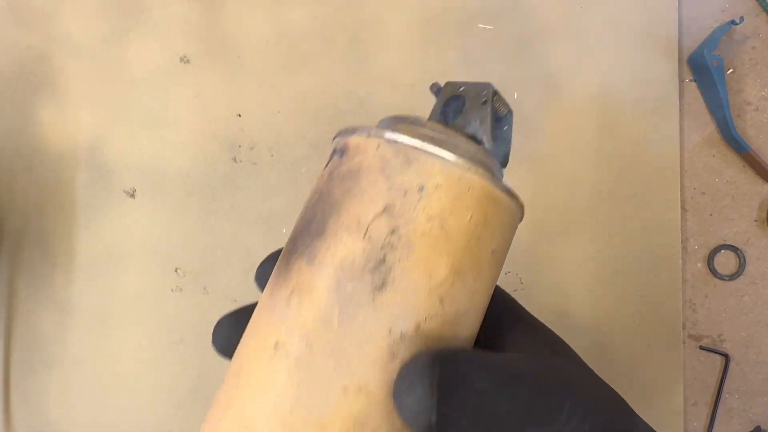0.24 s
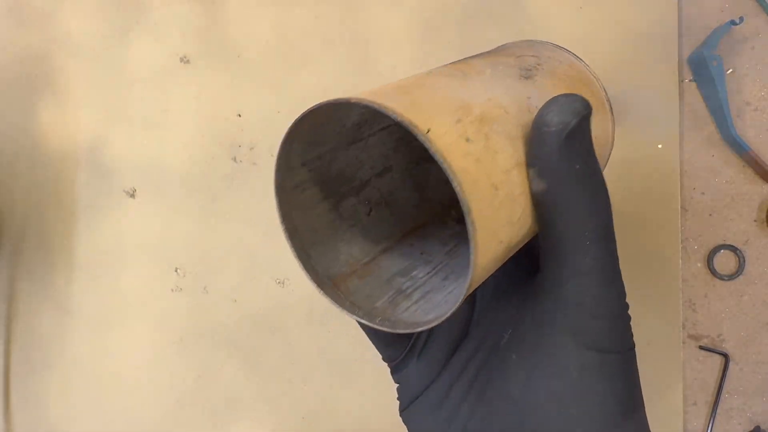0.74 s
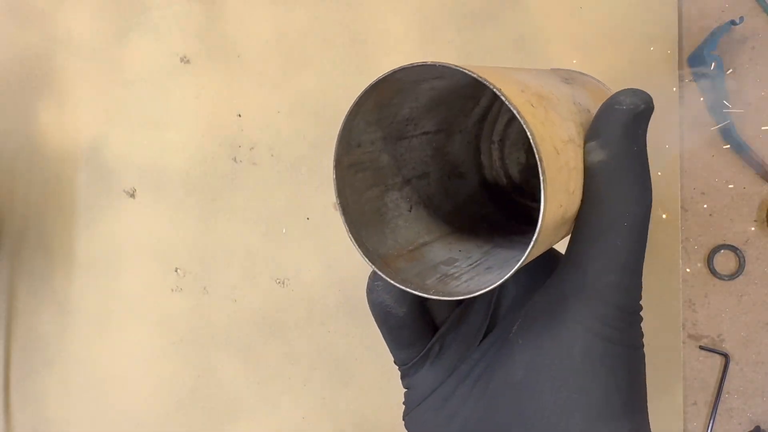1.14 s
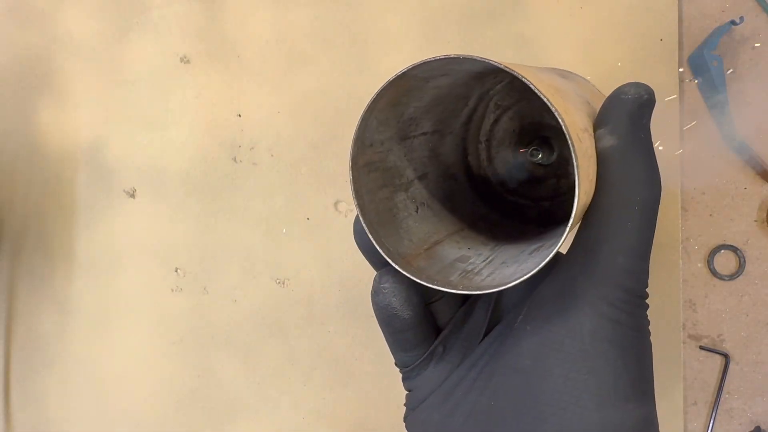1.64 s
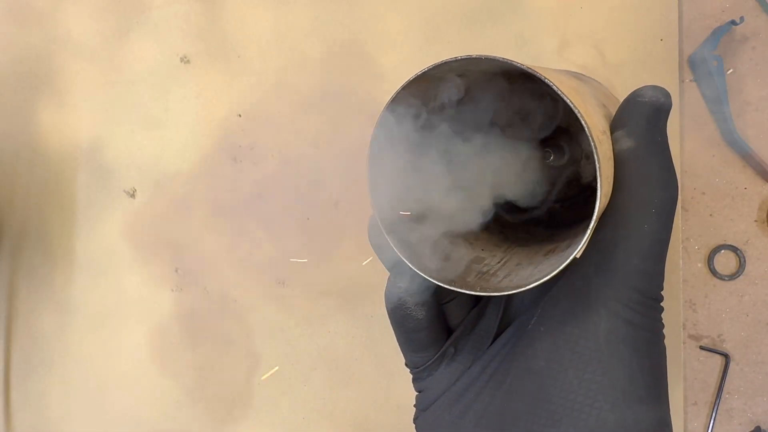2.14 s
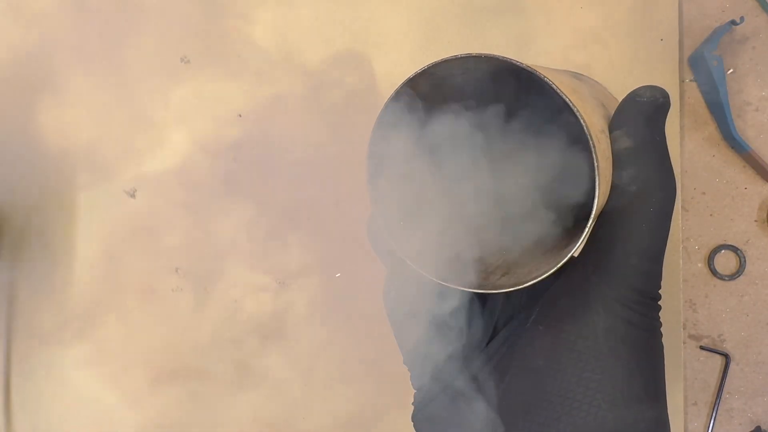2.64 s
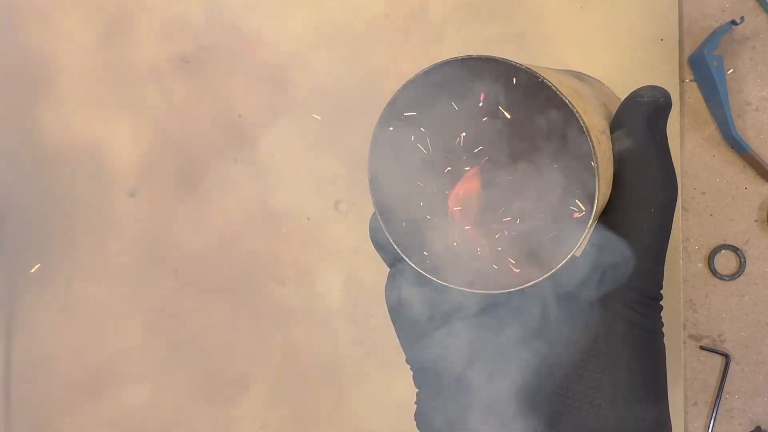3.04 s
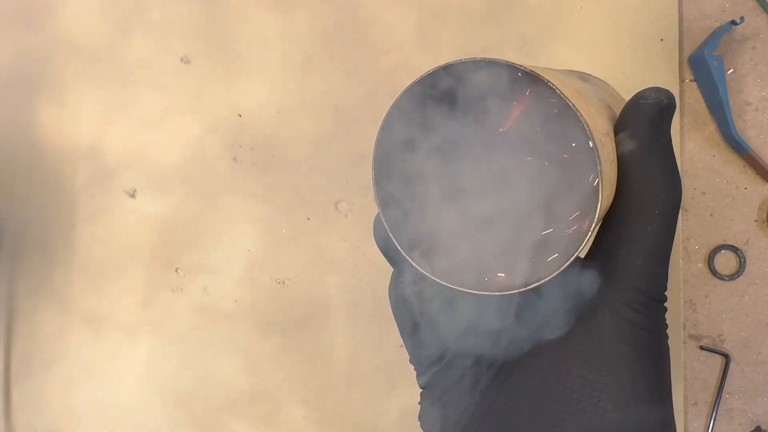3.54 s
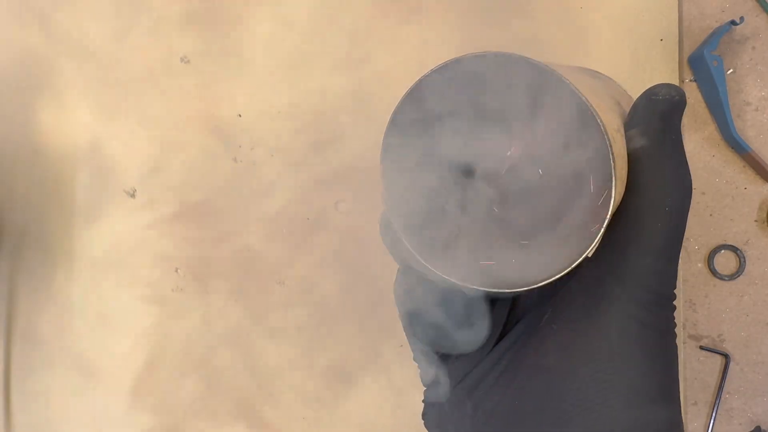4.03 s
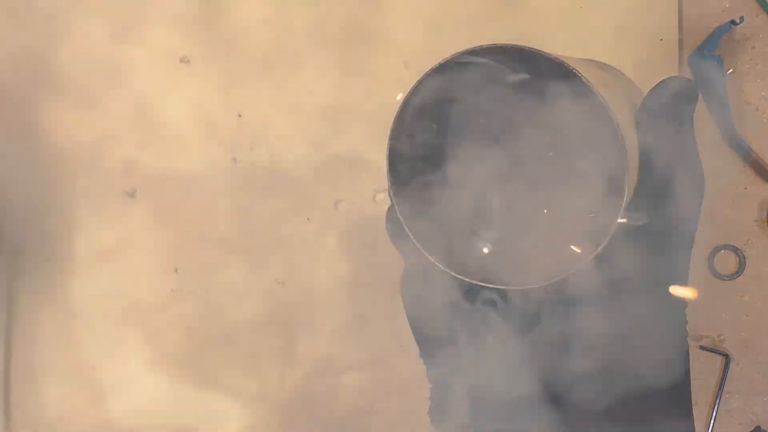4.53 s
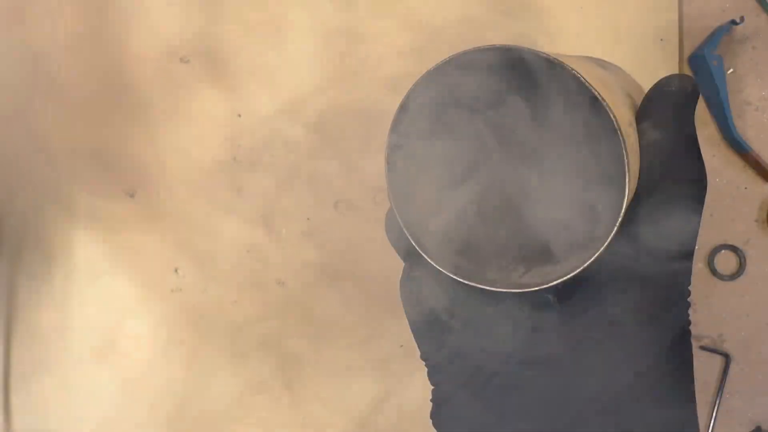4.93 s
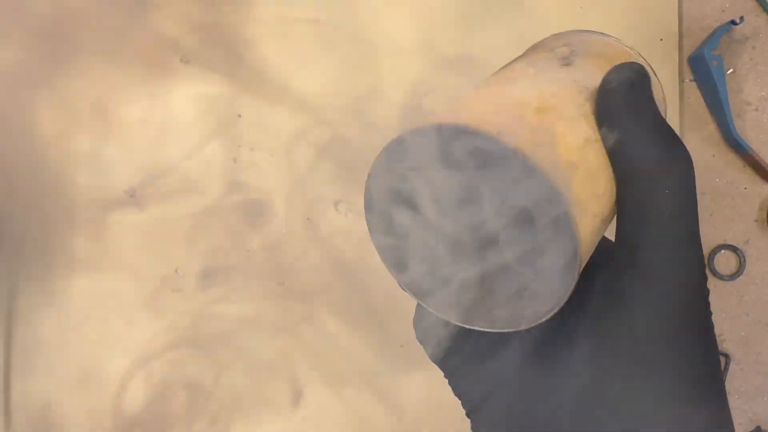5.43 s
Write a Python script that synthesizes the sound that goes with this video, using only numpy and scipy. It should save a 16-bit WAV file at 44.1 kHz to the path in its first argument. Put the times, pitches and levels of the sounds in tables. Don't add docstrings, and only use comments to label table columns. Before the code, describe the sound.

Close, dry take with the input overloading at first. From 0 s a fuze jet spits and crackles, dips briefly, then swells to a harsh distorted blast peaking around 0.22 s and cutting off by 0.25 s. A much quieter bright hiss continues, its tone sweeping as the can turns, with dense sharp sputters from about 0.7 to 1.6 s. It then sinks to a thin, whistly hiss, with faint hollow can resonance, through 2.9 s. At 2.95 s flame breaks into the can: a stuttering, fizzing onset with a sharp flare near 3.1 s, then a hollow, tube-like roar around 630 Hz rising past 700, fluttering and surging. It collapses after 4.37 s, with a small wheeze and a pop at 4.47 s. Sparse light metallic ticks follow, one clearer at 5.18 s, and a very faint glove rub near 5.35 s. Low mains hum and distant engine drone lie underneath.

```python
import sys
import numpy as np
from scipy import signal
from scipy.fft import rfft, irfft
from scipy.io import wavfile
from scipy.ndimage import uniform_filter1d, map_coordinates

SR = 44100
rng = np.random.default_rng(int(sys.argv[2]) if len(sys.argv) > 2 else 0)


def natural_amplitude(level_db):
    exponent = np.asarray(level_db, float) / 20
    return 10 ** exponent


def wav_record(signal):
    frames = np.transpose(np.atleast_2d(signal))
    bounded = np.clip(frames, -1, 1)
    quanta = np.round(bounded * 32767).astype(np.int16)
    wavfile.write(sys.argv[1], SR, quanta)


N = 250355
T = np.arange(N) / SR

# time in seconds, jet level in dB.
FIRST_BLAST = [(0.0, -13), (0.05, -21.5), (0.078, -25), (0.09, -18), (0.122, -20.5), (0.18, -14),
               (0.203, -10.5), (0.211, -12), (0.216, -5.5), (0.2425, -7), (0.245, -16.5), (0.256, -36),
               (0.28, -44)]
# time in seconds, jet level in dB.
LATER_BURN = [(0.28, -33), (0.576, -30.5), (0.71, -29), (0.816, -28), (1.08, -31), (1.478, -30.5),
              (1.59, -32), (1.62, -29), (1.722, -37.5), (1.88, -47), (1.92, -45.5), (2.09, -42.5),
              (2.15, -47.5), (2.328, -51), (2.56, -48), (2.72, -39.5), (2.9, -42), (2.95, -49)]


def vent():
    blast_db, blasting = curves(FIRST_BLAST, fade=.004)
    jet_db, burning = curves(LATER_BURN, fade=.018)
    away = ramp(.56, .76) ** 1.4
    fading = ramp(1.6, .11)
    sparking = np.interp(T, [.3, 1.1, 1.6, 1.9], [.35, .51, .49, .3])
    early = T < .27

    spits, small = vent_spits(jet_db, sparking, away)
    flow = noise() * steady_hiss(jet_db, burning, sparking)
    flow += np.sign(noise()) * (spits * ~early + small)
    blast = noise() * natural_amplitude(blast_db + 1.5 * wobble(300)) * blasting
    blast += np.sign(noise()) * spits * early

    puff = natural_amplitude(-36.5 + .2 * (blast_db + 22)) * (T < .25)
    puff += natural_amplitude(jet_db - 20) * burning * (1 - fading)
    return table_echo(turning_jet(flow, away, fading) + opening_blast(blast) + vent_puffs(puff))


# time in seconds, peak in dB, low puff in dB under it.
BLAST_SPITS = [(0.0014, -9.5, -21), (0.01, -3.5, -16.5), (0.015, -6.5, -16.5), (0.037, -5.5, -17.5),
               (0.0695, -8, -24.5), (0.0803, 2.5, -28.5), (0.089, -9, -20.5), (0.0926, -6.5, -19.5),
               (0.1065, -7, -5), (0.201, -1.5, -30.5), (0.216, 6, -41.5), (0.223, 3.5, -12),
               (0.229, 6.5, -10.5), (0.237, 7, -12.5)]
# time in seconds, peak in dB, low puff in dB under it.
SPUTTERS = [(0.3813, -12, -20.5), (0.5275, -15, -22), (0.6885, -11, -51), (0.7857, -3.5, -22.5),
            (1.3345, -5.5, -25.5), (0.825, -10.5, -24.5), (0.8564, -10, -54), (0.8815, -6, -34),
            (0.893, -4, -34.5), (0.8962, 2, -26.5), (0.9195, -6, -30), (0.9284, -9, -39),
            (0.9713, -3.5, -36), (0.993, -10, -44), (1.0305, -10, -42), (1.057, -11, -19),
            (1.0632, -6, -16.5), (1.07, -0.5, -22), (1.076, 0.5, -19.5), (1.146, -10.5, -39),
            (1.1662, -8.5, -29), (1.1863, -5, -22.5), (1.2193, -9, -14.5), (1.2427, -10, -21),
            (1.28, -10.5, -27), (1.3406, -1, -23), (1.3695, -5.5, -23.5), (1.45, -2.5, -19.5),
            (1.4588, -5, -16), (1.501, -8.5, -40), (1.5366, -8.5, -22), (1.551, -5.5, -21.5)]
# time in seconds, peak in dB.
SMALL_SPITS = [(0.3911, -21), (0.6066, -20), (0.6509, -24), (0.6545, -23), (0.7027, -18.5), (0.7073, -17),
               (0.7151, -19.5), (0.7459, -18), (0.7578, -17), (0.7651, -15), (0.7828, -16), (0.7924, -15),
               (0.8026, -15.5), (0.8186, -19.5), (0.8242, -20), (0.8296, -12.0), (0.8701, -20.5),
               (0.8758, -17.5), (0.9042, -15), (0.9133, -16), (0.9355, -18.5), (0.9552, -16.5),
               (0.9696, -21.5), (0.9817, -14.5), (0.9853, -14.5), (1.0213, -20.5), (1.0667, -16),
               (1.0825, -9.5), (1.0867, -8), (1.181, -13.9), (1.192, -13.5), (1.195, -19), (1.2161, -15.5),
               (1.2247, -17.5), (1.2654, -20), (1.2761, -17), (1.3058, -21), (1.3157, -18.5),
               (1.3185, -21.5), (1.3454, -15), (1.384, -20.5), (1.3913, -21.5), (1.4003, -20.5),
               (1.4248, -17), (1.4298, -19.5), (1.4442, -16), (1.4547, -14.5), (1.4623, -14.5),
               (1.4652, -13), (1.4697, -12.5), (1.543, -16.5), (1.5504, -20.5), (1.5563, -21),
               (1.5665, -15.6), (1.6047, -20), (1.6093, -17.5), (1.6144, -22.5), (1.6172, -21),
               (1.6316, -22), (1.6555, -20)]


def vent_spits(jet_db, sparking, away):
    s, db, _ = np.transpose(BLAST_SPITS + SPUTTERS)
    ms = np.ones(len(s))
    sharp = bursts(s + .0007, natural_amplitude(db - 4.5), .99 * ms, rise=.49)

    loud = np.clip((db + 16) / 8, 0, 1)
    cluster = bursts(np.maximum(s - .0015, 0), loud * natural_amplitude(db - 13), 4.95 * ms, rise=.78)
    cluster *= natural_amplitude(4.5 * wobble(400))

    when, size = rng.random((150, 2)).T
    stray = bursts(.55 + 1.1 * when, 2.1 - 2.3 * np.log(size + 1e-3), .22 + 0 * when)
    stray *= natural_amplitude(jet_db) * sparking * (.27 + away)

    small_s, small_db = np.transpose(SMALL_SPITS)
    small = bursts(small_s - .0003, natural_amplitude(small_db + 6.5), .65 + 0 * small_s, rise=.35)
    return sharp + cluster + stray, small


# time in seconds, level in dB.
LAST_WHEEZE = [
    (4.36, -42.5),
    (4.566, -66.5),
    (4.572, -61),
    (4.66, -77),
]


def steady_hiss(jet_db, burning, sparking):
    grain = natural_amplitude(sparking * (1.5 * wobble(450) + 2.5 * wobble(90) + .28 * wobble(19)))
    wheeze_db, wheezing = curves(LAST_WHEEZE, fade=.011)
    return natural_amplitude(jet_db) * burning * unit(grain) + wheezing * natural_amplitude(wheeze_db + 3.35 * wobble(120))


# frequency in Hz, level in dB.
FACING_TONE = [(710, -59.5), (1200, -16.5), (1840, -7), (3500, -5.5), (4630, -4.5), (5040, -3.5),
               (6450, -3.5), (9080, 4), (14600, -13), (15500, -10.5)]
# frequency in Hz, level in dB.
AWAY_TONE = [(710, -42.5), (1200, -22), (1440, -9.5), (1840, -22.5), (2010, -8.5), (2260, -21.5),
             (2410, -10.5), (2890, -9), (3150, -10.5), (4070, -2.5), (6590, -12.5), (7820, 3), (9000, -4.5),
             (10200, -4), (12800, -21), (14800, -10), (15600, -17)]
# frequency in Hz, level in dB.
FADING_TONE = [(710, -24.5), (1200, -7.5), (1690, -11), (1860, 4.5), (2360, -14.5), (5090, -7),
               (6950, -16.5), (8080, -8.5), (15500, -28.5)]
# frequency in Hz, level in dB.
WEAK_TONE = [(2060, -7), (3500, -5.5), (3680, 2.5), (4170, -17), (4690, -1), (5660, 0.5), (6450, -9),
             (6650, -17.5), (7820, 3), (8220, 1), (9020, -2), (11000, -3.5), (13200, -12.5), (14300, -12.5),
             (15500, -26.5)]
# frequency in Hz, width in Hz, level in dB.
WHISTLES = [(6300, 64, 1), (8000, 90, -4), (10950, 60, 4), (12300, 150, -5), (14200, 200, -2)]


def turning_jet(flow, away, fading):
    weak = ramp(1.76, .5)
    whistle = 0
    for hz, width, db in WHISTLES:
        whistle = whistle + natural_amplitude(db) * signal.lfilter(*signal.iirpeak(hz, hz / width, SR), flow)
    jet = (1 - away) * coloured(flow, FACING_TONE)
    jet += away * (1 - fading) * coloured(flow, AWAY_TONE)
    jet += (fading - weak) * coloured(flow, FADING_TONE)
    return jet + weak * coloured(flow + whistle, WEAK_TONE)


# frequency in Hz, level in dB.
IGNITION_TONE = [(590, -23), (1000, -4.5), (1390, -8), (2040, -1), (3010, 0), (5040, -1), (9700, 0),
                 (15500, -5)]
# frequency in Hz, level in dB.
FULL_TONE = [(590, -42), (1000, -15.5), (1530, -7), (2340, -14.5), (2560, -3), (3260, -9.5), (5280, -4.5),
             (5990, -7), (9810, 0.5), (14000, -6), (15500, -17)]


def opening_blast(blast):
    pressure = ramp(.1, .032)
    return (1 - pressure) * coloured(blast, IGNITION_TONE) + pressure * coloured(blast, FULL_TONE)


# frequency in Hz, level in dB.
PUFF_TONE = [(76, -46.5), (130, -3.5), (290, -4), (382, 1), (620, 3.5), (662, 2), (1800, -1), (2340, -20.5),
             (3960, -120)]


def vent_puffs(steady):
    s, db, low_db = np.transpose(BLAST_SPITS + SPUTTERS)
    puffs = bursts(s, natural_amplitude(db + low_db + 1.5), 3.74 + 0 * s)
    return coloured(noise() * (steady + puffs), PUFF_TONE)


def table_echo(jet):
    far_ms, near_ms, half_turned_s, steepness = .87, .25, .46, 2.6
    lag_ms = near_ms + (far_ms - near_ms) / (1 + (T / half_turned_s) ** steepness)
    lag_ms += .004 * wobble(14)
    return echoed(jet, lag_ms, .13 + .4 * bump(.62, .34), low_loss=.45)


# time in seconds, roar in dB, sharpness of the upper layers in dB over it.
FLAME_LEVEL = [(1.5, -51.5, -3), (1.76, -40, -18.5), (2.5, -46.5, 1), (2.76, -39.5, 4.5),
               (2.942, -41.5, -6), (2.958, -26.5, -13), (3.01, -24, -4.5), (3.047, -28.5, 3.5),
               (3.09, -21.5, -9.5), (3.16, -27.5, -2), (3.33, -30, -1.5), (3.41, -32.5, -9),
               (3.45, -28, -6), (3.65, -26, -8.5), (3.97, -27.5, -6), (4.37, -30.5, -6.5), (4.48, -61, -6),
               (4.65, -82, -6)]
# time in seconds, extra level in dB, length in ms.
FLARES = [
    (2.954, 6.5, 7.9),
    (3.095, 11, 2.2),
    (3.119, 4, 6.6),
    (3.433, 8.5, 17),
    (3.86, 6.5, 15),
    (4.06, 5, 12),
    (4.139, 8, 3.7),
    (4.237, 5, 33),
    (4.469, 27.5, 3.2),
]
# start in seconds, length in seconds, change in dB.
STARVING = [
    (3.012, 0.023, -7.5),
    (3.124, 0.014, -9.5),
    (4.003, 0.052, -3),
    (4.148, 0.074, -7.5),
]
# time in seconds, third mode in Hz.
GAS_HEAT = [(1.5, 3040), (2.95, 3050), (3.0, 3070), (3.1, 3190), (3.3, 3340), (3.6, 3385), (4.0, 3510),
            (4.27, 3610), (4.65, 3580)]


def can():
    roar_db, hiss_db, lit = curves(FLAME_LEVEL, fade=.02)
    third_hz, _ = curves(GAS_HEAT)
    heat = third_hz / 3050
    mouth = heat ** .61

    for s, length, db in STARVING:
        roar_db = roar_db + db * (ramp(s, .01) - ramp(s + length, .0061))
    s, db, ms = np.transpose(FLARES)
    flutter_db = .7 * wobble(30) + .7 * wobble(110)
    flicker = lit * natural_amplitude(roar_db + bursts(s, 1.9 * db, ms) + flutter_db)

    modes = lowest_mode(mouth) + second_mode(mouth, hiss_db) + third_mode(heat, third_hz, hiss_db)
    fizz = ramp(2.95, .09) * natural_amplitude(hiss_db) * slag_fizz(heat)
    return flicker * (modes + flame_rumble() + fizz)


# frequency when cool in Hz, width in Hz, level in dB.
FIRST_HOT = [(620.4, 41.2, -1), (820, 259, -10.5)]
# frequency in Hz, width in Hz, level in dB.
FIRST_BEFORE = [(628, 36, 0), (800, 330, -11.5), (1010, 120, -17)]
# frequency in Hz, width in Hz, level in dB.
ROUGH_OVERTONE = [(1000, 330, 0)]
# time in seconds, extra level in dB, half length in ms.
LOCKINGS = [(3.065, 6.5, 5.8), (3.4, 6.5, 23), (3.585, 2, 13), (3.625, 5.5, 37), (3.658, 1.5, 7.3),
            (3.825, 2, 7.9), (3.984, 6.5, 9.5), (4.068, 4.5, 9.4), (4.114, 0, 12), (4.249, 7.5, 10.3),
            (4.282, -6, 15), (4.32, 2.5, 42)]


def lowest_mode(mouth):
    hot = unit(coloured(column(FIRST_HOT, mouth, plain=.07, patchy_db=1.26), band(510, 800)))
    cold = unit(coloured(column(FIRST_BEFORE, mouth, plain=.059, patchy_db=.65), band(556, 1120)))
    roar = hot * ramp(2.95, .025) + cold * (1 - ramp(2.95, .047))
    roar += natural_amplitude(-7.5) * bump(3.075, .035) * unit(column(ROUGH_OVERTONE, mouth))
    core_db = np.where(T < 2.95, -11, -9)
    roar = unit(roar + natural_amplitude(core_db) * core(632 * mouth, .02184, 3.5))
    return natural_amplitude(swells(LOCKINGS)) * roar


# frequency in Hz, width in Hz, level in dB.
SECOND_MODE = [(1867, 335, 7.58), (1932, 380, 7.7)]
# time in seconds, extra level in dB, half length in ms.
SECOND_STUTTER = [
    (2.974, 6.5, 7.1),
    (3.003, 2, 10),
    (3.03, -18, 22),
    (3.052, -8.5, 15),
    (3.076, 4.5, 5.5),
    (3.094, 1, 7),
    (3.122, 1, 6),
    (3.136, -11.5, 6.7),
    (3.15, 2.5, 8),
]


def second_mode(mouth, hiss_db):
    level_db = -3.5 + .44 * hiss_db + swells(SECOND_STUTTER)
    return natural_amplitude(level_db) * unit(coloured(column(SECOND_MODE, mouth), band(1600, 3500)))


# frequency in Hz, width in Hz, level in dB.
THIRD_MODE = [(3050, 45, 0), (3150, 480, -13)]
# time in seconds, extra level in dB, half length in ms.
THIRD_MODE_STUTTER = [
    (2.93, -4, 25),
    (2.972, -3, 14.1),
    (3.006, 4.5, 12),
    (3.03, -6, 11),
    (3.047, 1, 8),
    (3.064, -3, 6),
    (3.13, 6, 6.5),
    (3.15, -7, 10),
]


def third_mode(heat, third_hz, hiss_db):
    ring = unit(coloured(column(THIRD_MODE, heat, patchy_db=-3), band(2660, 3800)))
    ring = unit(ring + natural_amplitude(-10) * (T > 2.95) * core(third_hz, .00396, 2.8))
    level_db = hiss_db + np.where(T < 2.95, -10, -2.5)
    level_db -= 8.5 * np.clip(T - 3.3, 0, 1)
    level_db += 16.5 * bump(5, .12) + swells(THIRD_MODE_STUTTER)
    return natural_amplitude(level_db) * ring


# frequency in Hz, width in Hz, level in dB.
UPPER_MODES = [(3520, 130, 7.5), (4870, 840, 0.5), (5000, 75, -28.5), (7120, 120, -6)]
# frequency in Hz, level in dB.
FIZZ_TONE = [(2180, -19.5), (3700, -12.5), (4480, -2.5), (5120, -0.5), (6200, -1.5), (7880, -3), (8670, -8),
             (9660, -6), (13700, -17.5), (15500, -29.5)]


def slag_fizz(heat):
    fizz = unit(coloured(column(UPPER_MODES, heat, plain=.36, patchy_db=3), FIZZ_TONE)) * natural_amplitude(wobble(300))
    spray = .3 * coloured(fizz, [(5000, -30), (9000, -3), (11000, 0), (15000, 3)])
    spray_db = 5.5 + 11.5 * bump(3.07, .026) - 8.5 * ramp(3.0, .308)
    fizz += (natural_amplitude(spray_db) - 1) * spray
    lag_ms = .51 + (.28 - .51) * bump(2.95, .078)
    return echoed(fizz, lag_ms, .31 * np.exp(-abs(T - 3.07) / .22))


# frequency in Hz, level in dB.
RUMBLE_TONE = [(76, -19), (130, -3), (204, -3.5), (391, -1.5), (458, 0), (520, -28), (680, -55),
               (1140, -120)]


def flame_rumble():
    return np.clip((T - 2.8) / .53, .55, 1) * natural_amplitude(-17 + 1.6 * wobble(18)) * coloured(noise(), RUMBLE_TONE)


# time in seconds, pitch in Hz, rms level in dB, half length in ms.
CLEAN_TONES = [(2.965, 625, -26, 19), (2.995, 645, -24, 16), (2.973, 1980, -25, 5.2), (2.996, 4550, -34, 5),
               (3.052, 4640, -32, 11), (3.066, 5230, -31, 7), (3.088, 1960, -30, 7.1),
               (3.099, 740, -20, 4.3), (3.099, 2080, -20, 3.8), (3.097, 5250, -37, 5.9),
               (3.119, 5640, -28, 5.8), (3.13, 3200, -31, 8), (3.177, 3790, -32, 6.9),
               (3.236, 5250, -26.5, 11), (1.81, 620, -47, 29), (1.936, 630, -38.5, 14),
               (2.32, 644, -44, 12), (2.782, 620, -36.5, 16), (3.655, 700, -17.5, 9), (4.417, 743, -39, 20),
               (4.472, 710, -54, 5), (5.155, 646, -63, 13.5)]


def singing():
    waver = 1 + .012 * wobble(150)
    out = np.zeros(N)
    for s, hz, db, ms in CLEAN_TONES:
        pitch = hz * (waver + 1.5 * np.clip(T - s, -.1, .1))
        out += natural_amplitude(db) * bump(s, ms / 1000) * np.sin(2 * np.pi * np.cumsum(pitch) / SR)
    return np.sqrt(2) * out


# time in seconds, peak in dB, centre in Hz.
COOLING_TICKS = [(4.47, -28.5, 2520), (4.487, -37, 8000), (4.509, -43.5, 6040), (4.525, -50, 7400),
                 (4.571, -39.5, 7650), (4.583, -40, 5080), (4.795, -40.5, 3320), (4.854, -43, 9230),
                 (4.9166, -45, 7960), (5.0594, -54, 9170), (5.1294, -52, 8800), (5.18, -34, 4860),
                 (5.2432, -53, 5100), (5.2832, -56, 8760), (5.3078, -53.5, 8980), (5.451, -42.5, 5560)]
# frequency in Hz, level in dB, 60 dB decay in seconds.
STEEL_WALL = [
    (3130, -6, 0.063),
    (5130, -3, 0.028),
    (7070, -23, 0.035),
    (8930, -10, 0.039),
    (10725, -21, .03),
]
# time in seconds, level in dB.
GLOVE_RUB = [
    (5.3, -89),
    (5.34, -67),
    (5.4, -66.5),
    (5.44, -75.5),
    (5.47, -87),
]


def handling():
    out, t = np.zeros(N + SR), np.arange(SR // 25) / SR
    for s, db, hz in COOLING_TICKS:
        click = np.sin(2 * np.pi * hz * t) * natural_amplitude(-60 * t / .0029)
        click += 1.1 * rng.standard_normal(len(t)) * natural_amplitude(-60 * t / .0149)
        ring = 0
        for f, level, t60 in STEEL_WALL:
            ring = ring + natural_amplitude(level + rng.normal(0, 3.5) - 60 * t / t60) * np.sin(2 * np.pi * f * t)
        out[int(s * SR):][:len(t)] += natural_amplitude(db - 11) * (click + natural_amplitude(-15) * ring)
    ticks = coloured(out[:N], [(500, -15), (2500, -6.5), (9000, -3.5), (12000, -10), (15500, -18.5)])

    rub_db, on = curves(GLOVE_RUB)
    rub = on * natural_amplitude(rub_db + 3.5 * wobble(300)) * noise()
    return ticks + coloured(rub, [(500, -7), (2000, -7), (5000, -5), (9000, -8), (14000, -25.5)])


def room(x):
    hz, t, z = signal.stft(rng.standard_normal(SR // 3), SR, nperseg=256)
    f, t60 = np.transpose(ROOM_DECAY)
    decay_s = np.interp(np.log(hz + 1), np.log(f), t60)[:, None]
    tail = signal.istft(z * natural_amplitude(-60 * t / decay_s), SR, nperseg=256)[1]
    return signal.fftconvolve(np.pad(x, (150, 0)), tail / np.linalg.norm(tail))[:N]


# frequency in Hz, 60 dB decay in seconds.
ROOM_DECAY = [(150, .09), (1000, .09), (8000, .07), (15000, .04)]
# frequency in Hz, rms level in dB.
MAINS_HUM = [(60, -58), (120, -89)]
# time in seconds, pitch in Hz, level in dB.
IDLING_ENGINE = [(0.3, 104.7, -62), (0.89, 101.9, -58), (2.46, 95.5, -59.5), (3.01, 91.5, -55.5),
                 (3.23, 93.8, -71), (3.56, 95, -53), (3.7, 88, -63)]
# time in seconds, pitch in Hz, level in dB.
PASSING_ENGINE = [(3.9, 91.3, -56), (4.122, 94, -52), (4.22, 89.6, -50.5), (4.528, 95.3, -49.5),
                  (5.008, 101, -53.5), (5.677, 100.3, -57.5)]
# multiple in elevenths of its pitch, level in dB.
ENGINE_ORDERS = [(5, -24), (8, -9), (9, -14), (11, 0), (13, -10), (16, -20)]
# frequency in Hz, level in dB.
FLOOR_TONE = [(15, -35.5), (25, -23.5), (55, -10), (96, -4), (122, -17.5), (188, -16.5), (253, -17.5),
              (410, -20.5), (804, -19), (1050, -26.5), (2560, -35), (9060, -36.5), (15500, -37)]


def background():
    hum = sum(natural_amplitude(db) * np.sin(2 * np.pi * hz * T) for hz, db in MAINS_HUM)
    hz, db, on = curves(IDLING_ENGINE, fade=.3)
    hum += on * natural_amplitude(db + 1.5 * wobble(7.4)) * np.sin(2 * np.pi * np.cumsum(hz) / SR)
    hz, db, on = curves(PASSING_ENGINE, fade=.59)
    shaft = 2 * np.pi * np.cumsum(hz) / SR / 11
    for k, level in ENGINE_ORDERS:
        hum += on * natural_amplitude(db + level + wobble(5.9)) * np.sin(k * shaft + k * k)
    return np.sqrt(2) * hum + natural_amplitude(-61 + .8 * wobble(6.6)) * coloured(noise(), FLOOR_TONE)


def column(modes, heat, plain=0, patchy_db=2.5):
    hz, t, z = signal.stft(noise(), SR, nperseg=1024)
    f = hz[:, None] / np.interp(t, T, heat)
    gain = plain
    for k, (centre, width, db) in enumerate(modes):
        damping = 1j * f * width
        gain = gain + (-1) ** k * natural_amplitude(db) * damping / (centre * centre - f * f + damping)
    patches = uniform_filter1d(rng.standard_normal(z.shape), size=14, axis=0)
    patches = uniform_filter1d(patches, size=6, axis=1)
    return signal.istft(z * gain * natural_amplitude(patchy_db * unit(patches)), SR, nperseg=1024)[1][:N]


def core(hz, waver, swing_db):
    phase = 2 * np.pi * np.cumsum(hz * (1 + waver * wobble(45))) / SR
    return np.sqrt(2) * natural_amplitude(swing_db * wobble(25)) * np.sin(phase)


def echoed(x, lag_ms, echo, low_loss=0):
    late = map_coordinates(x, [np.arange(N) - lag_ms * SR / 1000], order=3)
    late = uniform_filter1d(late, size=2) * natural_amplitude(1.2 * wobble(12))
    late = late - low_loss * uniform_filter1d(late, size=7)
    return (x + echo * late) / np.sqrt(1 + echo ** 2)


def coloured(x, points):
    f, db = np.transpose(points)
    hz = np.fft.rfftfreq(4096, 1 / SR)
    gain = natural_amplitude(np.interp(np.log(hz + 1), np.log(f), db)) + 1e-5
    gain *= natural_amplitude(-np.clip((hz - 15730) / 6, 0, 50))
    cepstrum = irfft(np.log(gain))
    cepstrum[1:2048] *= 2
    cepstrum[2049:] = 0
    kernel = irfft(np.exp(rfft(cepstrum)))
    return signal.fftconvolve(x, kernel / np.linalg.norm(kernel))[:N]


def band(lo_hz, hi_hz):
    return [(20, -60), (.5 * lo_hz, -20), (.69 * lo_hz, -10), (lo_hz, 0), (hi_hz, 0),
            (10 * hi_hz, -12), (20000, -70)]


def bursts(times, gains, lengths_ms, rise=.92):
    out = np.zeros(N + SR)
    for s, gain, ms in zip(times, gains, lengths_ms):
        u = np.arange(int(6 * ms * SR / 1000)) / (ms * SR / 1000)
        out[int(s * SR):][:len(u)] += gain * (1 - np.exp(-u / rise)) * np.exp(-u)
    return out[:N]


def curves(rows, fade=.03):
    s, *cols = np.transpose(rows)
    gate = np.clip(np.minimum(T - s[0] + fade, s[-1] + fade - T) / fade, 0, 1)
    return [np.interp(T, s, c) for c in cols] + [gate]


def swells(rows):
    return sum(db * bump(s, ms / 1000) for s, db, ms in rows)


def bump(s, span):
    return np.exp(-((T - s) / span) ** 2)


def ramp(s, takes):
    return np.clip((T - s) / takes, 0, 1)


def wobble(rate):
    return map_coordinates(rng.standard_normal(int(N * rate / SR) + 4), [T * rate])


def noise():
    return rng.standard_normal(N)


def unit(x):
    return x / np.sqrt(np.mean(x ** 2) + 1e-20)


def scene():
    near = vent() + can() + singing() + handling()
    return (near + natural_amplitude(-13.5) * room(near) + background())[None]


def top_cut(x):
    return signal.sosfilt(signal.butter(12, 15760, fs=SR, output="sos"), x)


def record(dry):
    top = .88
    clipped = dry / (1 + abs(dry / top) ** 8) ** (1 / 8)
    return top_cut(clipped)


dry = scene()
out = record(dry)
wav_record(out)
```